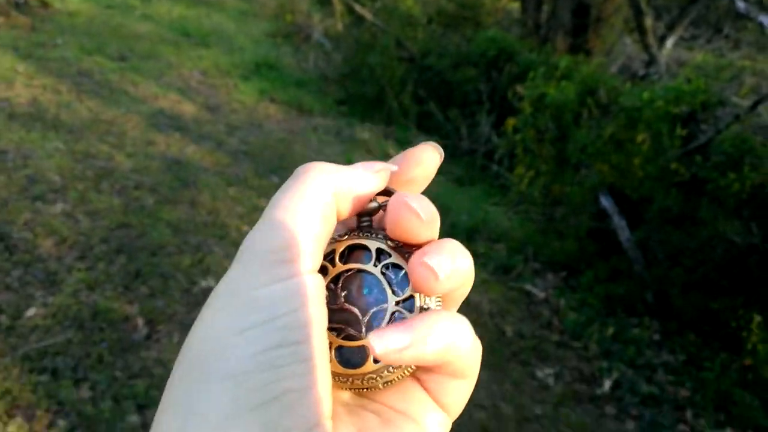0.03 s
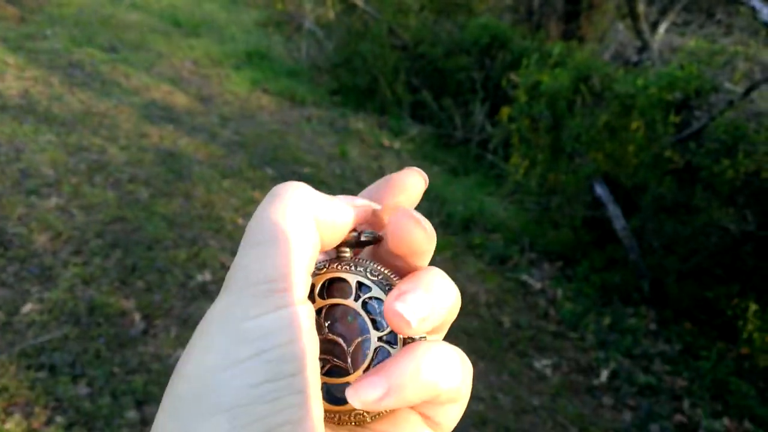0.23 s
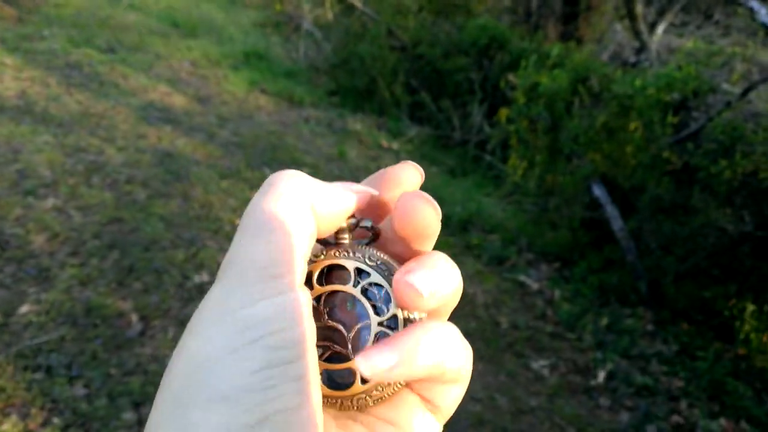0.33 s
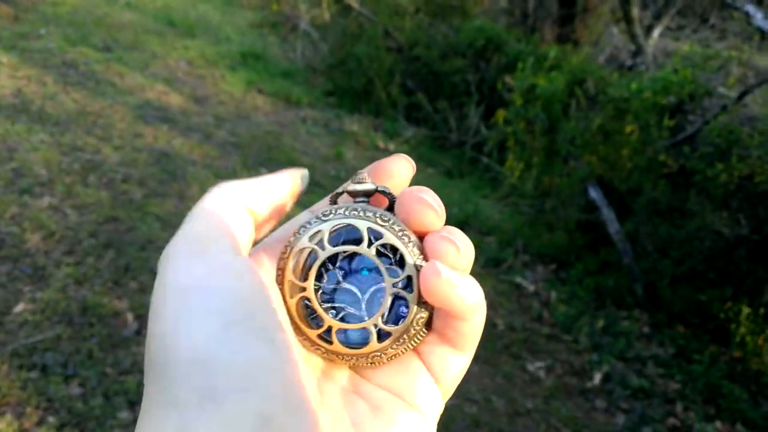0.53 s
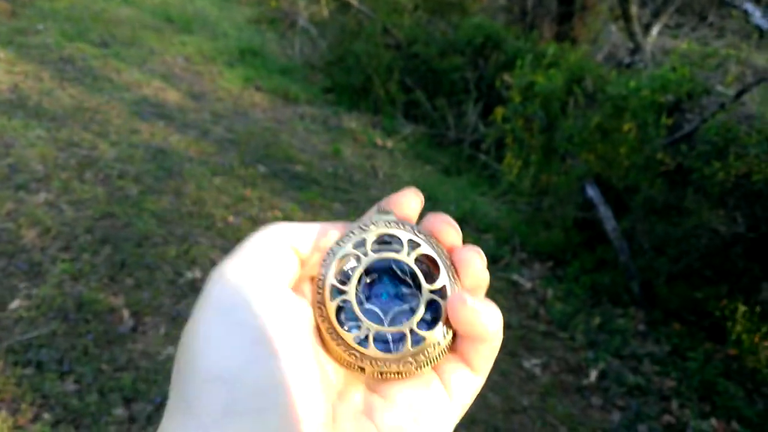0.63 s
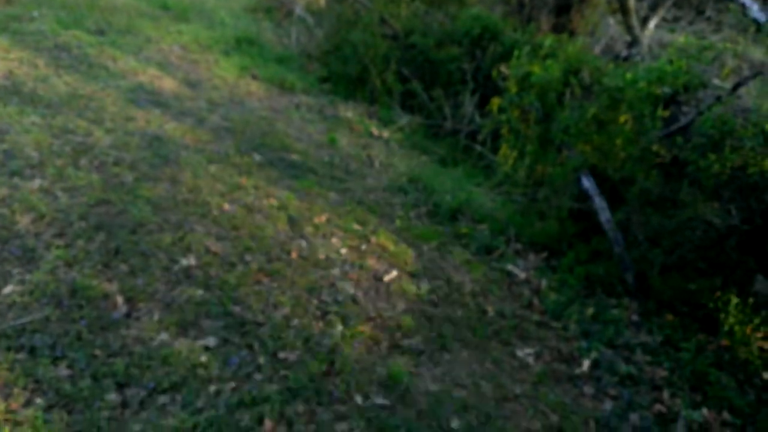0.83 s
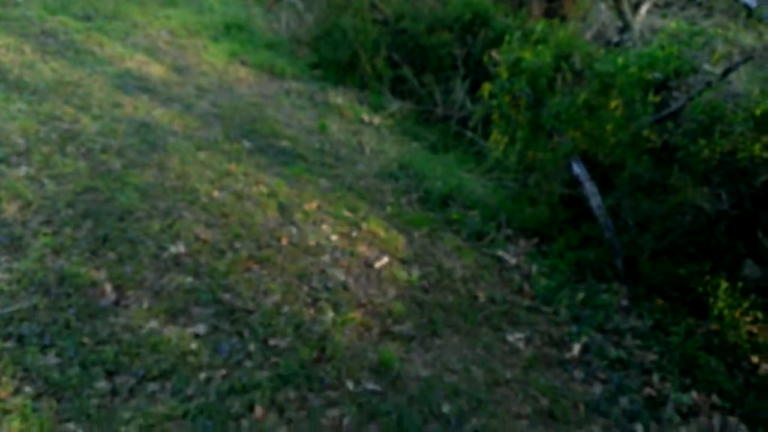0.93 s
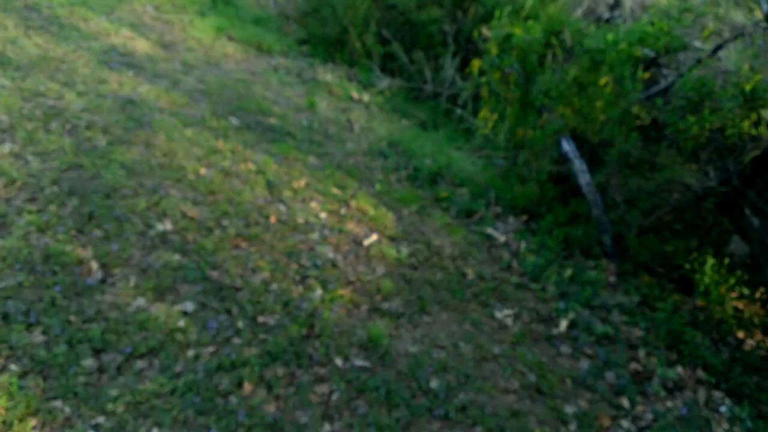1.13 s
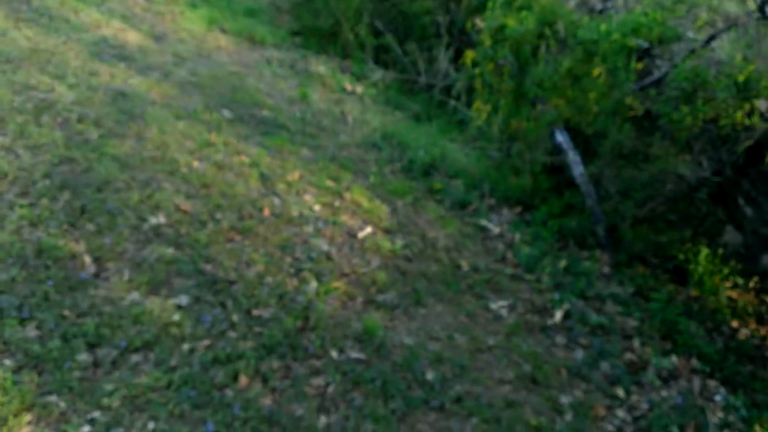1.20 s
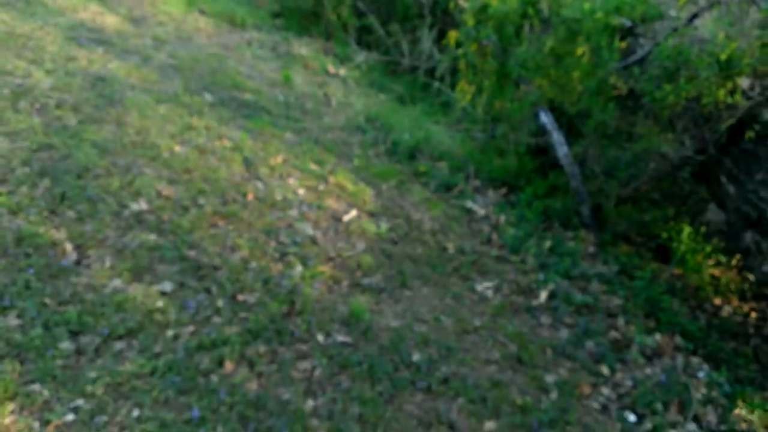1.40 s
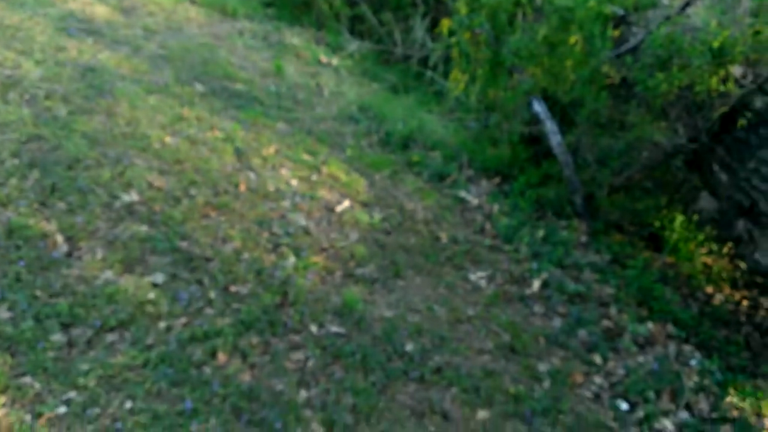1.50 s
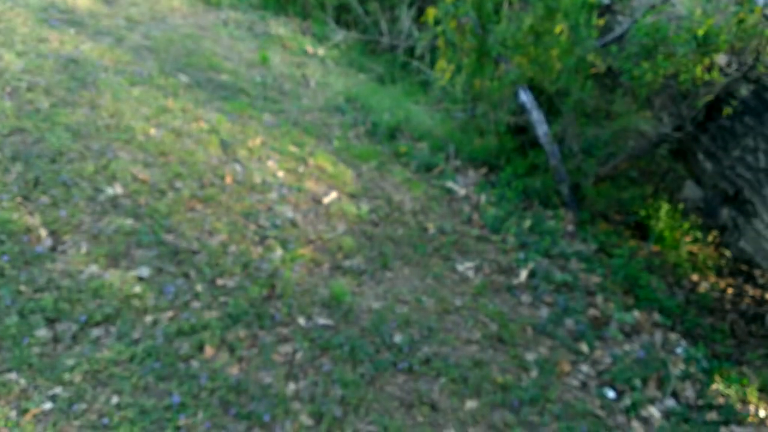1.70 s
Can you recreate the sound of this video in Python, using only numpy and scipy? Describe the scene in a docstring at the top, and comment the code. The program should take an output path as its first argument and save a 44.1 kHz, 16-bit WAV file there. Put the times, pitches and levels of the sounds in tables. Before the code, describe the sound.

A metal pocket watch is worked by hand close to a stereo microphone: a few sharp catch and lid clicks, soft handling bumps, then a brief chain clink, over quiet outdoor hush and light wind rumble.

```python
"""Pocket watch handled outdoors

A metal pocket watch is worked close to the microphone: catch and lid strikes and a hinge scrape excite
decaying modes of case and lid, and knocking links ring the modes of chain and bow.
Shaped noise makes the outdoor hush, the light wind on the ports, the sleeve and the ticking leaves.
Short low swings make handling bumps, and a sine that slurs down makes a small bird's two calls."""
import sys
import numpy as np
from scipy import signal
from scipy.fft import rfft, irfft
from scipy.io import wavfile

SR = 44100
rng = np.random.default_rng(int(sys.argv[2]) if len(sys.argv) > 2 else 0)


def store_wav(level_fs):
    """Save 16-bit WAV to argv[1]."""
    pcm = np.round(np.clip(np.atleast_2d(level_fs), -1, 1) * 32767)
    wavfile.write(sys.argv[1], SR, pcm.T.astype(np.int16))


N = 77175


def undb(db):
    """Decibels to gain."""
    return 10 ** (np.asarray(db) / 20)


def unit(x):
    """Scale to rms 1."""
    return x / np.sqrt(np.mean(x ** 2))


def pan(db):
    """Left and right gains, together of rms 1, for a left-minus-right level difference."""
    gains = undb(np.array([[db], [-db]]) / 2)
    return unit(gains)


def since(start):
    """Seconds after a moment, zero before it."""
    return np.maximum(np.arange(N) / SR - start, 0)


def noise(colour):
    """Unrelated left and right noise of rms 1, coloured by (Hz, dB) or (Hz, left dB, right dB) points."""
    hz, *sides = np.array(colour, float).T
    log_f = np.log(np.maximum(np.fft.rfftfreq(N, 1 / SR), 1))
    gain = undb([np.interp(log_f, np.log(hz), side) for side in sides])
    spectrum = rfft(rng.standard_normal((2, N)))
    return unit(irfft(spectrum * gain, N))


def band(hz, width):
    """Noise of rms 1 in one steep resonance, centre and width in Hz."""
    f = np.fft.rfftfreq(N, 1 / SR)
    resonance = 1 / (1 + (2 * (f - hz) / width) ** 2)
    return unit(irfft(rfft(rng.standard_normal(N)) * resonance, N))


def air():
    """Outdoor hush: steady coloured noise whose level swells a little and flickers."""
    # Each row: frequency in Hz, left and right relative density in dB per Hz.
    air_colour = [(30, -29, 2), (148, 0, 6.5), (465, 2, -5.5), (1045, -1.5, -1.5), (1580, -12, -13),
                  (2560, -14.5, -12.5), (3830, -18.5, -11), (5400, -21, -19), (8540, -21.5, -29),
                  (11250, -28, -29.5), (16700, -34, -32)]
    # Slow swell of the hush. Each row: time in seconds, level offset in dB.
    air_swell = [(0, -1), (.15, -2), (.35, 1.5), (.65, .5), (1.0, -0.65), (1.55, -0.5), (1.75, 0.5)]
    level_db, flicker_db = -56.5, 1.66  # the flicker is an rms depth
    swell_db = np.interp(since(0), *np.array(air_swell).T)
    flicker = flicker_db * band(0, 9.8)
    return undb(level_db + swell_db + flicker) * noise(air_colour)


def wind():
    """Each port rumbles on its own; stronger wind adds higher eddies, which grow faster than the wind."""
    # Wind strength at the two ports. Each row: time in seconds, left dB, right dB.
    wind_strength = [(0, -49, -49), (.17, -54.5, -47.5), (.25, -74, -43), (.31, -59, -46.5),
                     (.36, -55, -44.5), (.40, -45.5, -40), (.47, -48, -38.5), (.56, -54, -34.5),
                     (.62, -48, -44.5), (.67, -40, -40.5), (.76, -48.5, -45.5), (.88, -53.5, -47),
                     (1.05, -51, -51.5), (1.28, -61.5, -63.5), (1.318, -55, -47.5), (1.481, -47, -44),
                     (1.54, -52.5, -63), (1.75, -52.5, -52.5)]
    # Light wind's low rumble. Each row: frequency in Hz, relative density in dB per Hz.
    rumble_colour = [(20, -23), (48, -55), (66, -5.5), (90, 7), (140, 6), (200, -5.5), (300, -24.5),
                     (500, -29), (1200, -52), (4000, -80)]
    # Eddies of strong gusts. Each row: frequency in Hz, relative density in dB per Hz.
    eddy_colour = [(60, -15), (150, -7), (250, 7), (370, -1), (520, -22), (800, -34), (2000, -29),
                   (6000, -73)]
    rumble_max_db = -39.5  # above this, a gust only adds eddies
    gust_db, eddy_db = -37.5, -4.5  # strength of a full gust, and its eddies relative to that
    eddy_growth = 1.935  # dB of eddies per dB of wind

    times, *sides = np.array(wind_strength).T
    wind_db = np.array([np.interp(since(0), times, side) for side in sides])
    rumble = undb(np.minimum(wind_db, rumble_max_db)) * noise(rumble_colour)
    eddies = undb(gust_db + eddy_db + eddy_growth * (wind_db - gust_db)) * noise(eddy_colour)
    return rumble + eddies


def bird():
    """A thin note slurs down and settles on one pitch; its end lingers among the trees as a narrow noise."""
    # Calls. Each row: start in seconds, level in dB.
    calls = [(.688, -59.5), (1.473, -63)]
    note_hz, slur_hz, slur_s = 7920, 957, 0.0075  # settled pitch, starting height above it, fall time
    rise_s = 0.0096  # the note peaks this long after its start
    echo_db, echo_s = -15.5, 0.03  # relative level and peak time of the lingering end
    out = 0
    for start, db in calls:
        t = since(start)
        hz = note_hz + slur_hz * np.exp(-(t / slur_s) ** 2)
        u, v = (t / rise_s) ** 2, t / echo_s
        note = np.sin(2 * np.pi * np.cumsum(hz) / SR) * np.sqrt(u) * np.exp((1 - u) / 2)
        echo = undb(echo_db) * band(note_hz, 260) * v ** 2 * np.exp(1 - v ** 2)
        out = out + undb(db) * (note + echo)
    return out * pan(16)


def ticks():
    """Dry leaves and twigs tick: small bursts of resonant noise, each with its own pitch."""
    # Each row: peak in seconds, level in dB, centre in Hz, width in Hz, left-minus-right in dB.
    leaf_ticks = [(1.136, -50.5, 7780, 700, 22), (1.189, -54, 8750, 9000, 25), (1.194, -54, 3740, 3030, -8),
                  (1.347, -53, 2550, 600, 4), (1.518, -53.5, 1670, 2200, 8), (1.527, -53, 3550, 2200, -13),
                  (1.526, -50.5, 8150, 1600, 26), (1.549, -56.5, 2410, 1100, 5),
                  (1.553, -58, 8850, 10000, 15), (1.56, -52.5, 3630, 1500, -21),
                  (1.603, -57, 9200, 5000, 25)]
    rise_s = 0.00095
    out = 0
    for peak, db, hz, width, pan_db in leaf_ticks:
        u = since(peak - rise_s) / rise_s
        burst = band(hz, width) * u * np.exp(1 - u)
        out = out + undb(db) * pan(pan_db) * burst
    return out


def sleeve():
    """Cloth hisses softly while the arm moves: coloured noise faded in and out."""
    # Each row: start in seconds, end in seconds, level in dB.
    brushes = [(-.05, .2, -67.5), (0.818, 1.18, -63.5), (1.294, 1.645, -70.5)]
    # Each row: frequency in Hz, left and right relative density in dB per Hz.
    cloth_colour = [(1520, -27, -5), (2780, -4.5, -12.5), (4070, 3, 12), (5500, -2, -14), (6750, 2.5, -1),
                    (8940, 7.5, -23), (11600, -10, -22), (16000, -13, -36)]
    fade_s = 0.14  # fades are centred on start and end
    t = since(0)

    def fade(x):
        """Straight ramp from 0 to 1, halfway at x = 0."""
        return np.clip(x / fade_s + .5, 0, 1)

    level = sum(undb(db) * fade(t - start) * fade(end - t) for start, end, db in brushes)
    return noise(cloth_colour) * level


def bumps():
    """Soft, low handling knocks through the microphone's housing, with a sharper edge at the peak."""
    # Each row: peak in seconds, level in dB before the trim, pitch in Hz,
    # half length in seconds, left-minus-right in dB.
    handling = [(.222, -35.5, 99, 0.009, -20), (.276, -35, 198, 0.0053, -29),
                (.333, -39.5, 163, 0.0059, -11), (0.399, -35, 204, 0.013, -27),
                (0.424, -33.5, 259, 0.0042, -36), (.455, -39.5, 108, .014, 6),
                (.492, -28, 153, 0.0037, -30), (.513, -35, 124, 0.0053, 19),
                (0.527, -26.5, 202, 0.0033, -32), (0.55, -24.5, 184.7, 0.0089, -31),
                (.561, -27.5, 225, 0.0063, -15.5), (0.589, -39.5, 282, 0.011, -17),
                (0.648, -42, 270, 0.0072, -23), (.676, -27.5, 112, 0.011, -24),
                (.702, -40, 115, 0.0068, -6), (0.8196, -32, 182, 0.0033, -34),
                (.912, -36, 146, 0.0035, -37), (1.024, -36, 176, 0.0017, -36),
                (1.306, -39.5, 134, 0.0026, -17), (1.494, -37, 116, 0.013, -26),
                (1.642, -35, 147, 0.0017, 35)]
    trim_db, roughness, edge = -1, 0.34, 0.11
    out = 0
    for peak, db, hz, length, pan_db in handling:
        t = since(0) - peak
        swell = np.exp(-.5 * (t / length) ** 2)
        turn = 2 * np.pi * hz * t
        sharp = edge * swell ** 4 * np.cos(2 * turn)
        rough = roughness * band(1.55 * hz, 1.05 * hz)
        swing = -np.cos(turn) - sharp + rough
        out = out + undb(db + trim_db) * pan(pan_db) * swing * swell
    return out


def strike(start):
    """One sharp contact, a single-sample impulse, followed by a trace of decaying grit."""
    grit_db, contact_s = -21, .0007
    t = since(start)
    push = undb(grit_db) * rng.standard_normal(N) * (t > 0) * np.exp(-t / contact_s)
    push[int(start * SR)] += 1
    return push


def ring(push, mode, order):
    """One decaying mode as both microphones hear it; neighbouring modes swing in opposite directions."""
    hz, t60, left_db, right_db = mode
    pole = np.exp((2j * np.pi * hz - np.log(1000) / t60) / SR)
    # The tiny offset keeps the filter from slowing down on near-zero numbers.
    swing = signal.lfilter([2 * (1 - abs(pole))], [1, -pole], push + 1e-18).real
    return (-1) ** order * undb([[left_db], [right_db]]) * swing


def chain():
    """A quick cluster of links knocks against the bow and rings the modes of both."""
    # Link knocks. Each row: start in seconds, level in dB, extra dB into the modes over 7 kHz.
    links = [(0.7738, -21, 22.5), (0.776, -17, 4), (.7752, -21.5, 12), (0.7759, 0.5, -4), (0.7782, -4, -8),
             (.7810, -7, -10), (.7865, -17, -14)]
    # Modes of chain and bow. Each row: frequency in Hz, t60 in seconds, left dB, right dB.
    chain_modes = [(2290, 0.013, -16.5, -9.5), (3320, 0.012, -12.5, -12.5), (3240, 0.045, -23, -17),
                   (4070, 0.025, -24, -1), (4520, 0.011, -7, -16), (6200, .005, -22, -33),
                   (7860, 0.012, -9.5, -39), (8750, 0.006, -17.5, -41), (10500, 0.00071, -27, -45),
                   (14300, 0.0028, -19, -44)]
    hits = [(strike(start) * undb(db), bright) for start, db, bright in links]
    out = 0
    for k, mode in enumerate(chain_modes):
        high = mode[0] > 7000
        blows = sum(push * undb(bright * high) for push, bright in hits)
        out = out + ring(blows, mode, order=k)
    return out


def hinge_scrape():
    """The hinge scrapes briefly: a swell of tiny slips at random moments."""
    level_db, slips_per_s = -33.5, 1700
    middle_s, width_s = .561, .016
    slips = (rng.random(N) < slips_per_s / SR) * rng.standard_normal(N)
    return undb(level_db) * slips * np.exp(-.5 * ((since(0) - middle_s) / width_s) ** 2)


def watch_case():
    """Catch and lid strikes and the hinge scrape ring the case; the strikes also ring the lid."""
    # Catch and lid strikes. Each row: start in seconds, level in dB, then extra dB into the case modes
    # under 5 kHz, at 5-7.4 kHz and over 10 kHz, and extra dB into the lid's ring.
    clicks = [(.4280, -51, 30.5, -12, -8, 5), (.4420, 2, -1, -2, -4, -11), (0.502, -1, -3, -7, 0.5, -6),
              (.5360, -28, 3, 0, -6, -1), (0.5487, -5, -5.5, -14, -11, 0.5), (0.5645, -25, 2, 1, -3, -6),
              (0.5671, -12.5, 1, -29, -4, -7), (0.5732, -19.5, -15, -24, -10, 19.5),
              (0.578, -37.5, 18, 6, -6, 12), (.5820, -37, 17, -20, -11, 10)]
    # Modes of the case, damped by the palm. Each row: frequency in Hz, t60 in seconds, left dB, right dB.
    case_modes = [(1190, 0.0086, -2.5, -11.5), (2600, 0.0035, -5.5, -8), (3135, 0.0088, 1, 4),
                  (3800, 0.013, 3, -14), (3950, 0.031, -3, -1.5), (5060, 0.0055, -11, -7.5),
                  (5420, 0.0072, -33, 4.5), (6320, 0.0061, -19, 0.5), (6300, 0.027, -15, 1),
                  (6880, 0.0063, 6.5, 3), (7810, 0.008, 7.5, -13), (8580, 0.0078, 10, -6),
                  (10610, 0.0026, 2.5, -28), (10930, 0.0051, 7.5, -20), (13400, 0.0026, 0.5, -29),
                  (14960, 0.0026, 5, -3.5), (14960, 0.0048, 9, -5)]
    # Modes of the thin lid. Each row: frequency in Hz, t60 in seconds, left dB, right dB.
    lid_modes = [(3260, 0.068, -4, 2), (7850, .03, -15, -3.5)]
    scrape_low_db = -6.5  # the scrape drives the modes under 7.4 kHz less

    scrape = hinge_scrape()
    hits = []
    for start, db, low, middle, top, lid in clicks:
        extra = (low, middle, 0, top)  # 7.4-10 kHz has no extra
        hits.append((strike(start) * undb(db), extra, lid))
    out = 0
    for k, mode in enumerate(case_modes):
        zone = np.searchsorted([5000, 7400, 10000], mode[0])
        blows = sum(push * undb(extra[zone]) for push, extra, _ in hits)
        rub = scrape * undb(scrape_low_db * (zone < 2))
        out = out + ring(blows + rub, mode, order=k)
    on_lid = sum(push * undb(lid) for push, _, lid in hits)
    return out + sum(ring(on_lid, mode, order=k) for k, mode in enumerate(lid_modes))


def port_lag(x):
    """The watch is a little nearer the left port, so its sound reaches the right one a moment later."""
    lag_s = .00003
    late = np.exp(-2j * np.pi * np.fft.rfftfreq(N, 1 / SR) * lag_s)
    return np.array([x[0], irfft(rfft(x[1]) * late, N)])


def scatter(x):
    """Add the faint, short tail of decaying noise thrown back by hand and ground."""
    tail_db, t60_s = -43, 0.046
    decay = np.exp(-np.log(1000) * since(0) / t60_s)
    tail = undb(tail_db) * rng.standard_normal((2, N)) * decay
    return x + signal.fftconvolve(x, tail, axes=1)[:, :N]


def scene():
    """The watch in front, small sounds and wind around it."""
    surroundings = air() + wind() + bird() + ticks()
    handling = sleeve() + bumps()
    watch = scatter(port_lag(watch_case()) + chain())
    return surroundings + handling + watch


def record(dry):
    """The ports delay their resonant band, an all-pass effect; the recorder cuts the bottom and the top."""
    port_hz, port_width_hz = 3900, 650
    low_cut_hz, top_hz = 28, 16500
    r = np.exp(-np.pi * port_width_hz / SR)
    poles = [1, -2 * r * np.cos(2 * np.pi * port_hz / SR), r * r]
    x = signal.lfilter(poles[::-1], poles, dry)  # reversed coefficients: delay without level change
    x = signal.sosfilt(signal.butter(4, low_cut_hz, "highpass", fs=SR, output="sos"), x)
    return signal.sosfilt(signal.ellip(8, .2, 70, top_hz, fs=SR, output="sos"), x)


dry = scene()
out = record(dry)
store_wav(out)
```